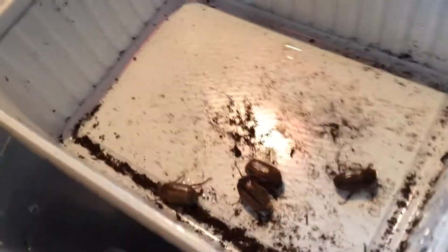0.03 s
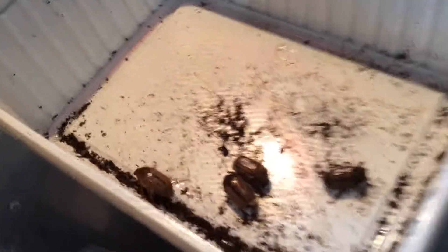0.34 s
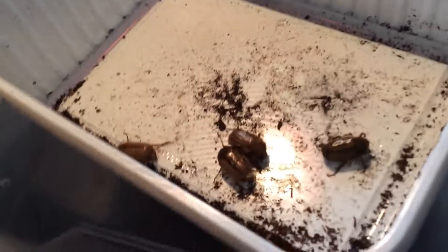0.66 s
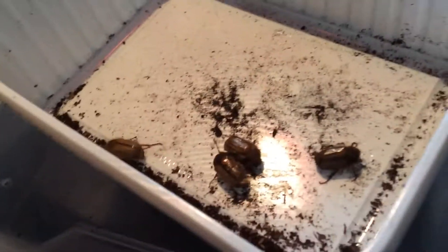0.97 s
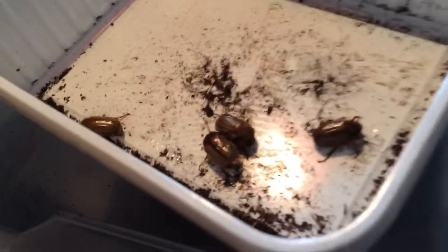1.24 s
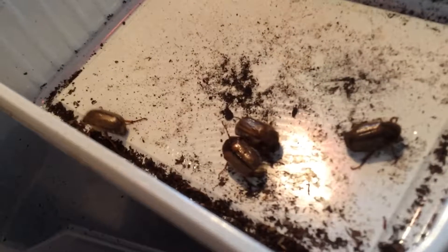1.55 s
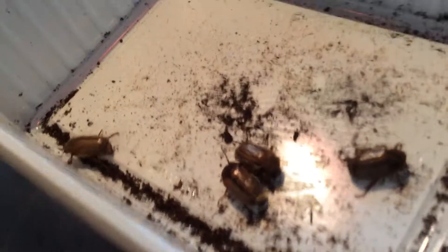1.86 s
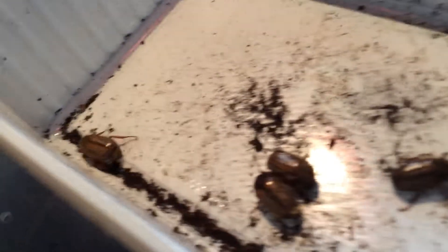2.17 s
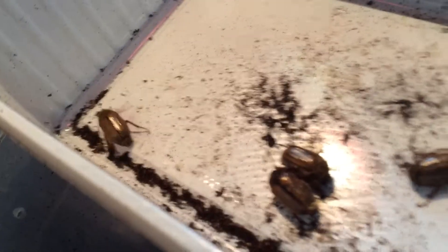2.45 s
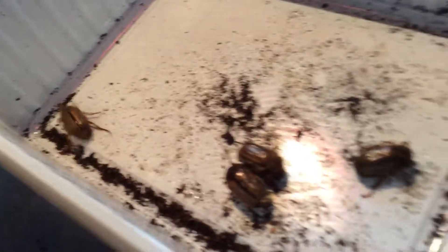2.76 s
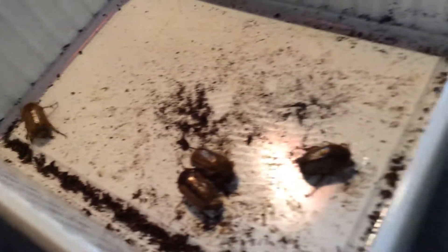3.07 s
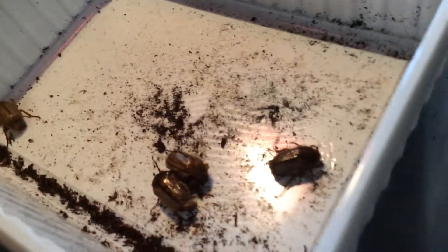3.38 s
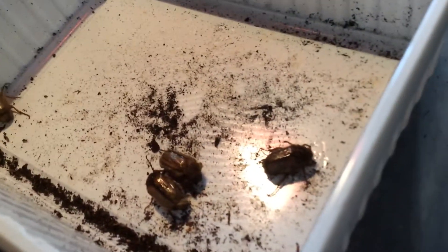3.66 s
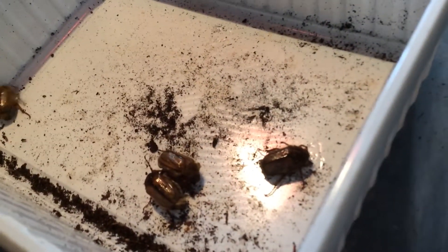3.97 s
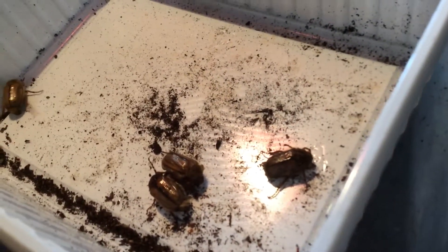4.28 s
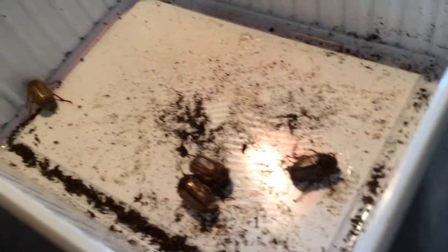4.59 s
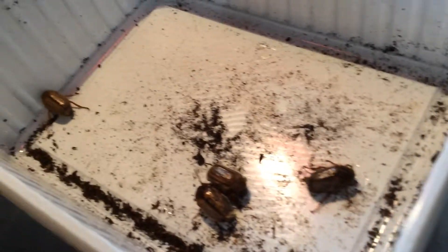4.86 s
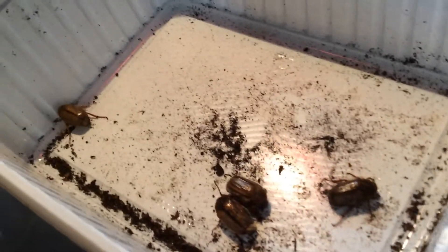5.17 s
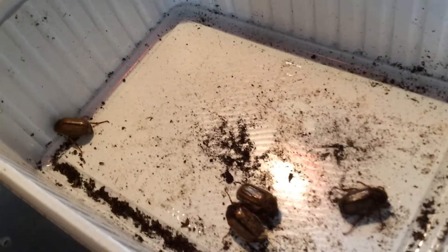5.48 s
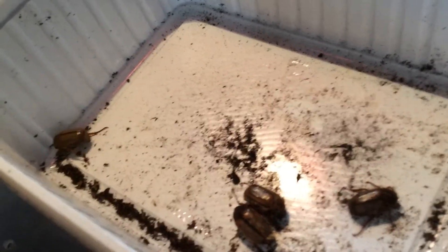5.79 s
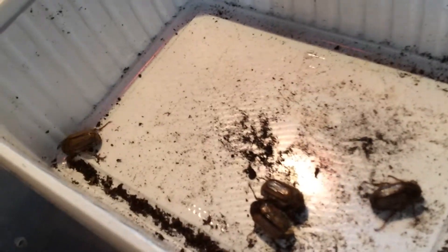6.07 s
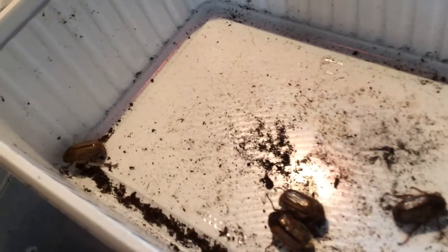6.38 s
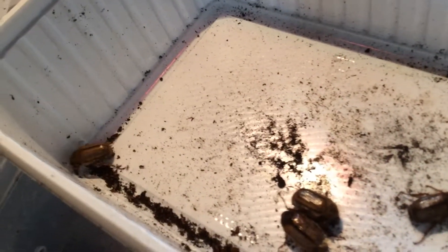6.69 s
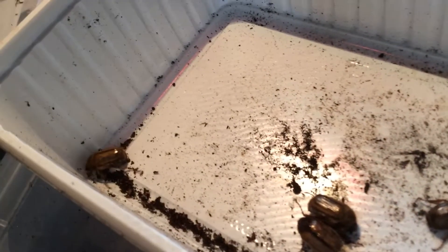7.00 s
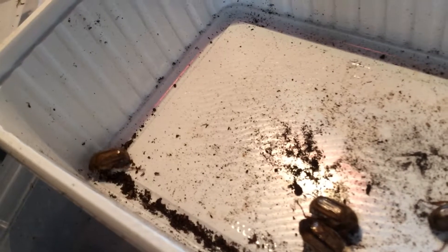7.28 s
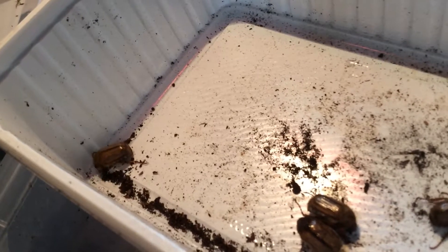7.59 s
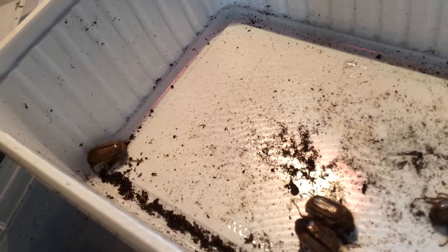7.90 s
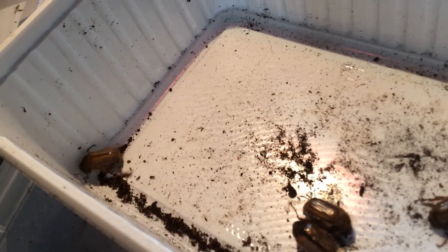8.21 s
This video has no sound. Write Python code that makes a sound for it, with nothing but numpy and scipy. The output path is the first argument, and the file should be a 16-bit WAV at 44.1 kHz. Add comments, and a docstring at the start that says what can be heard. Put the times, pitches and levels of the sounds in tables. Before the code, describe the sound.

A budgerigar chatters across a small room, its quick gliding notes, some pure and some husky, broken by short harsh squawks and a few sharp pips. The calls come irregularly throughout, with brief gaps. Close to the microphone, beetles scratch very faintly in a plastic tub, with small ticks and dry scuffs. The room adds a short reverberation over quiet hiss and low rumble.

```python
"""A budgerigar warbles in a small room: quick gliding notes, pure or husky, broken by harsh squawks
and a few sharp pips. A membrane in its syrinx vibrates in harmonic partials; unsteady vibration makes
a note husky, and chaotic vibration with turbulent air makes a squawk. Close by, beetles scratch
faintly in a plastic tub by stick-slip friction, among small ticks and dry scuffs.
The room reverberates, over quiet hiss, rumble and hum."""
import sys
import numpy as np
from scipy import signal
from scipy.fft import rfft, irfft, next_fast_len
from scipy.io import wavfile
from scipy.ndimage import map_coordinates

SR = 44100
rng = np.random.default_rng(int(sys.argv[2]) if len(sys.argv) > 2 else 0)


def unload_audio(sound):
    """Save the sound as a 16-bit wav file, at the path given as the first command line argument."""
    columns = np.transpose(np.atleast_2d(sound))
    # keep every value between -1 and 1, then stretch to whole-number steps
    steps = np.round(np.clip(columns, -1, 1) * 32767)
    wavfile.write(sys.argv[1], SR, steps.astype(np.int16))


N = 363384

# The notes of three syllables, timed in shares of the syllable's length:
# start_share, length_share, start_hz, end_hz, level_db, huskiness
CHATTER_NOTES = [(.03, .27, 2888, 2767, -5, 95), (.18, 0.256, 3445, 3166, -2, 170),
                 (.3, .36, 1930, 2448, -6, 133), (.53, .37, 3150, 2370, -0.5, 110),
                 (.82, .18, 2236, 1392, -8.5, 255)]  # an arch in two voices
CHUCKLE_NOTES = [(.01, 0.15, 2426, 2370, -3.5, 100), (.17, .21, 3518, 2884, -0.5, 150),
                 (.17, .38, 2650, 1777, -8.5, 171), (.47, .35, 2800, 2580, 0, 200),
                 (.77, .21, 2290, 1435, -6, 250)]  # both voices slide down
SQUEAL_NOTES = [(0, .45, 2980, 2750, -10, 260), (.18, .56, 3990, 3530, -13, 290),
                (.19, .5, 2280, 2100, -8.5, 200), (.57, .22, 2457, 2776, 0, 131),
                (.71, 0.26, 2937, 3800, -1, 270)]  # a husky start, pressed upward
# Each time the bird sings them:
# start_s, length_s, level_db, pitch_ratio, crescendo_db, accent_db, overtone_db
CHATTER_REPEATS = [(1.162, .15, -37, 0.97, -1.5, 6, -26), (3.23, .16, -45, 1.0, 0, -3.5, -32),
                   (3.449, .14, -35.5, 0.99, -12.5, 1.5, -26.5), (3.743, .14, -43.5, .98, 4, -12, -23),
                   (6.378, .15, -52.5, .98, 1, -3.5, -23), (6.913, 0.15, -43, 1.16, 4, 1, -24.5),
                   (7.216, .165, -32.5, 1.02, 1.5, 5, -18.5), (7.411, 0.16, -29.5, 1, -10.5, 1, -23),
                   (7.744, 0.16, -38, 1, -6.5, 3, -25.5)]
CHUCKLE_REPEATS = [(1.585, 0.15, -43, 1.003, 5, 1.5, -25), (1.803, 0.15, -38.5, 1.032, -4.5, 0.5, -30.5),
                   (2.019, .14, -49, .97, -11, 4.5, -22), (2.828, 0.19, -51, 0.84, 2, -1, -24),
                   (4.259, 0.19, -54.5, .91, 2.5, -0.5, -34), (4.525, .143, -46, 0.96, -2.5, 3, -30),
                   (5.818, 0.18, -51, .96, 3, 0.5, -14), (7.932, 0.12, -45, 1, 6, 0.5, -29.5)]
SQUEAL_REPEATS = [(.622, 0.13, -28, 1.03, -10, 5.5, -18), (0.849, 0.16, -25.5, 0.99, 10.5, -1.5, -13.5),
                  (5.307, .142, -32, .96, 5.5, 0.5, -18.5), (5.546, 0.19, -29.5, 1.006, 0, -4, -17.5)]


def warble():
    """Two-voiced song by superposition: overlapping glides form syllables, with whistles between."""
    return (syllables(CHATTER_NOTES, CHATTER_REPEATS) + syllables(CHUCKLE_NOTES, CHUCKLE_REPEATS)
            + syllables(SQUEAL_NOTES, SQUEAL_REPEATS) + whistles())


def syllables(notes, repeats):
    """Time scaling and transposition: one figure recurs, accented on its last note but one."""
    out = np.zeros(N)
    for start_s, length_s, level_db, pitch_ratio, crescendo_db, accent_db, overtone_db in repeats:
        for k, (start_share, length_share, start_hz, end_hz, note_db, huskiness) in enumerate(notes):
            from_middle = start_share + length_share / 2 - 0.5
            stress_db = crescendo_db * from_middle + accent_db * (k == len(notes) - 2)
            sound = note(length_share * length_s, pitch_ratio * start_hz, pitch_ratio * end_hz,
                         huskiness, overtone_db)
            add(out, start_s + start_share * length_s, amp(level_db + note_db + stress_db) * sound)
    return out


# Single notes between the syllables: start_s, length_s, start_hz, end_hz, level_db, huskiness
WHISTLES = [(.008, 0.013, 1596, 1604, -49.5, 44), (0.121, 0.034, 1990, 1700, -58.5, 149),
            (0.227, 0.091, 2250, 1620, -58, 160), (.515, 0.05, 3260, 3040, -36.5, 133),
            (0.54, 0.035, 3440, 4010, -35.5, 210), (0.559, 0.021, 2395, 803, -47.5, 252),
            (0.733, .02, 1920, 838, -50, 249), (1.042, 0.028, 1050, 980, -46, 80),
            (2.339, 0.12, 2320, 2380, -58, 470), (2.545, 0.077, 2440, 1630, -57, 300),
            (3.1, 0.0064, 3280, 3980, -45.5, 280), (3.877, 0.12, 1280, 1183, -58.5, 70),
            (4.091, 0.079, 954, 1354, -57, 22.8), (4.117, 0.033, 2217, 2406, -42, 119),
            (4.147, 0.057, 2570, 2795, -40, 90), (4.184, 0.033, 1877, 1335, -48, 201),
            (4.922, 0.027, 1540, 1690, -48, 80), (4.95, .038, 2790, 2890, -45, 236),
            (5.112, 0.021, 3355, 3240, -43.5, 200), (5.118, 0.053, 1868, 1180, -57.5, 185),
            (7.645, 0.033, 1640, 1617, -45, 46)]


def whistles():
    """Nonlinear brightening: the harder a lone note is driven, the larger its share of overtones."""
    out = np.zeros(N)
    for start_s, length_s, start_hz, end_hz, level_db, huskiness in WHISTLES:
        sound = note(length_s, start_hz, end_hz, huskiness, overtone_db=level_db + 22.5)
        add(out, start_s, amp(level_db) * sound)
    return out


# Spectrum of the air noise in a note: frequency_hz, gain_db
BREATH_SPECTRUM = [(700, -11), (1600, -0.5), (3000, -3.5), (6000, -1), (8500, -3.5), (10500, -20),
                   (15500, -46)]
BEAK_HZ, BEAK_HALF_WIDTH_HZ, BEAK_GAIN_DB = 8240, 510, 7


def note(length_s, start_hz, end_hz, huskiness, overtone_db):
    """Frequency modulation: an unsteady membrane makes a glide husky; beak resonance adds squeak."""
    t = np.arange(SR // 5) / SR
    progress = np.clip(t / length_s, 0, 1)
    glide_hz = start_hz + (end_hz - start_hz) * progress
    jitter_hz = 0.75 * huskiness * wobble(600, len(t))
    waver_hz = 70 * wobble(140.6, len(t))
    partials_db = [0, overtone_db, overtone_db - 11.5, overtone_db - 18.5]
    tone = syrinx(glide_hz + jitter_hz + waver_hz, partials_db)
    tone = coloured(tone, lambda hz: amp(BEAK_GAIN_DB / (1 + ((hz - BEAK_HZ) / BEAK_HALF_WIDTH_HZ) ** 2)))
    # a slower beat in the syrinx adds rough sidebands
    beat_hz = 620 + 130 * wobble(302.3, len(t))
    grit = 1 + 0.27 * np.sin(2 * np.pi * np.cumsum(beat_hz) / SR)
    breath = amp(overtone_db + 2) * noise(BREATH_SPECTRUM, len(t))
    cutoff_hz = 0.71 * min(start_hz, end_hz)  # nothing is radiated far below the note
    voice = coloured(grit * tone + breath, lambda hz: 1 / np.sqrt(1 + (cutoff_hz / (hz + 1)) ** 10))
    flutter = unit(amp(4 * wobble(130, len(t))))
    swell = np.abs(np.sin(np.pi * progress)) ** 0.29
    return in_room(swell * flutter * voice, wet=0.56)


def syrinx(pitch_hz, partials_db):
    """Harmonic series: a vibrating membrane sounds whole multiples of one pitch track."""
    phase = 2 * np.pi * np.cumsum(pitch_hz) / SR
    return unit(sum(amp(level_db) * np.sin(k * phase) * (k * pitch_hz < SR / 2)
                    for k, level_db in enumerate(partials_db, 1)))


# Harsh squawks: start_s, length_s, level_db, pitch_hz, scatter, tilt_db_per_octave
SQUAWKS = [(0.344, 0.048, -21, 2790, 0.1477, -3), (2.662, 0.042, -23, 2950, 0.143, -2),
           (3.582, 0.047, -22.5, 2880, 0.144, -1), (3.927, 0.056, -20.5, 2866, 0.076, 0.5),
           (4.722, 0.11, -22, 2843, 0.079, 0.5), (5.666, 0.04, -22.5, 2940, 0.133, -2.5),
           (7.119, 0.086, -22.5, 3078, 0.1521, 1.5), (8.129, 0.058, -20.5, 3018, 0.093, -0.5)]
# Frequency response of the throat: frequency_hz, gain_db
THROAT_RESPONSE = [(410, -51), (700, -46.5), (1270, -27.5), (1580, -21), (2160, -15), (2630, -9.5),
                   (2990, -8), (3320, -3.5), (4080, -7.5), (5940, 0.5), (7400, -8), (8760, -10),
                   (12600, -12.5), (14500, -25), (15500, -29)]


def squawks():
    """Source and filter: a membrane driven into chaos and turbulent air sound through the throat."""
    out, t = np.zeros(N), np.arange(SR // 5) / SR
    for start_s, length_s, level_db, pitch_hz, scatter, tilt_db_per_octave in SQUAWKS:
        jitter = 0.729 * scatter * wobble(1800, len(t))
        voice = syrinx(pitch_hz * (1 + jitter), partials_db=[-1.5, 4, 12, -2.5, 10.5])
        turbulence = amp(2.5) * rng.standard_normal(len(t))
        rasp = (voice + turbulence) * amp(4 * wobble(450, len(t)))
        cry = coloured(rasp, lambda hz: amp(along(THROAT_RESPONSE, hz)
                                            + tilt_db_per_octave * np.log2((hz + 1) / 6000)))
        attack = np.clip(t / 0.016, 0, 1)
        release = np.clip((length_s - t) / 0.011 + 0.5, 0, 1)
        add(out, start_s, in_room(amp(level_db) * attack * release * unit(cry), wet=0.89))
    return out


# Very short contact calls: start_s, level_db, pitch_hz
PIPS = [(1.41, -38.5, 2573), (3.263, -48.5, 2300), (6.086, -39, 2653), (6.682, -40.5, 2402)]


def pips():
    """Harmonic tone bursts: the pitch sags slightly and the second partial is strongest."""
    out, t = np.zeros(N), np.arange(SR // 20) / SR
    for start_s, level_db, pitch_hz in PIPS:
        jitter = 0.04 * wobble(999, len(t))
        tone = syrinx(pitch_hz * (1 - 1.5 * t + jitter), partials_db=[-7, 1, -9.5, -10.5, -14])
        add(out, start_s, in_room(amp(level_db) * pulse(t, rise_s=0.0058) * tone, wet=0.51))
    return out


# Scratching activity of the beetles: time_s, level_db
CLAW_ACTIVITY = [(0, -64.5), (1.5, -68.5), (2.3, -57), (2.6, -71), (3.4, -69), (4.5, -74), (5.3, -59),
                 (6.2, -74.5), (6.5, -62), (6.7, -65.5), (6.95, -62.5), (7.2, -59), (8.24, -68)]
# Spectrum of a contact on the plastic: frequency_hz, gain_db
SCRATCH_SPECTRUM = [(600, -14), (1500, 7), (2500, 5.5), (5000, 1.5), (9000, 2), (13000, 2.5), (15500, -48)]
SLIPS_PER_S, SLIP_DECAY_S = 130, 0.0049


def beetles():
    """Stick-slip friction: claws catch and slip on plastic in tiny random clicks, bunched into steps."""
    sizes = amp(2.7 * np.clip(rng.standard_normal(N), -2, 2))
    slips = (rng.random(N) < SLIPS_PER_S / SR) * sizes
    steps = amp(3.5 * wobble(22, N))
    t = np.arange(SR // 50) / SR
    envelope = signal.fftconvolve(slips * steps, np.exp(-t / SLIP_DECAY_S))[:N]
    scratching = in_room(envelope * noise(SCRATCH_SPECTRUM, N), wet=0.23)[:N]
    return amp(curve(CLAW_ACTIVITY)) * unit(scratching)


# Small hard contacts on the plastic: start_s, level_db, ring_db
TICKS = [(0.7878, -48, -3), (1.1175, -43.5, -17), (2.266, -47, -20), (2.34, -46.5, -4), (2.4992, -41, -40),
         (2.517, -47.5, -0.5), (3.2824, -54, 0), (5.1966, -44.5, -23), (6.2287, -63, -27),
         (6.4173, -55, -28)]
# Vibration modes of the tub: frequency_hz, level_db, t60_s
TUB_MODES = [(817, -3.5, 0.068), (1100, -9, 0.01845), (1304, -6, 0.023), (2150, -19, 0.014),
             (3520, -12, 0.02)]


def ticks():
    """Impact excitation: each contact cracks and briefly rings the damped modes of the tub."""
    out, t = np.zeros(N), np.arange(SR // 8) / SR
    for start_s, level_db, ring_db in TICKS:
        crack = noise(SCRATCH_SPECTRUM, len(t)) * np.exp(-t / 0.0027)
        ring = sum(amp(mode_db + 2 * rng.normal() - 60 * t / t60_s) * np.sin(2 * np.pi * hz * t)
                   for hz, mode_db, t60_s in TUB_MODES)
        add(out, start_s, in_room(amp(level_db) * (crack + amp(ring_db) * ring), wet=0.55))
    return out


# Short dry rubs: start_s, rise_s, level_db
SCUFFS = [(1.5, 0.012, -54), (3.266, 0.0053, -54), (6.77, 0.013, -45.5), (6.844, 0.0084, -55)]


def scuffs():
    """Friction noise: brief grainy rubs swell and die away."""
    out, t = np.zeros(N), np.arange(SR // 8) / SR
    spectrum = [(250, -47), (700, -5.5), (1500, -2), (3000, 2.5), (5000, -5.5), (7000, -10.5),
                (15500, -18)]
    for start_s, rise_s, level_db in SCUFFS:
        grains = unit(amp(1.44 * wobble(540, len(t))))
        rub = grains * noise(spectrum, len(t))
        add(out, start_s, in_room(amp(level_db) * pulse(t, rise_s) * rub, wet=0.27))
    return out


# Reverberation time of the room: frequency_hz, t60_s
ROOM_DECAY = [(500, .32), (2500, .31), (6000, .3), (10000, .28), (15000, .24)]


def in_room(x, wet):
    """Reverberation: direct sound plus a diffuse tail, new each time because the source moves."""
    hz, t, spectra = signal.stft(rng.standard_normal(SR // 2), SR, nperseg=256)
    decay = amp(-60 * t / along(ROOM_DECAY, hz)[:, None])
    tail = signal.istft(spectra * decay, SR, nperseg=256)[1]
    tail *= 1 - np.exp(-np.arange(len(tail)) / SR / 0.0024)  # reflections build up
    response = np.sqrt(wet) * tail / np.linalg.norm(tail)  # wet is the tail's share of the energy
    response[0] += np.sqrt(1 - wet)
    heard = signal.fftconvolve(x, response)
    return heard * np.linalg.norm(x) / (np.linalg.norm(heard) + 1e-20)


# Spectrum of the steady room noise: frequency_hz, gain_db
HISS_SPECTRUM = [(15, -29), (25, -4), (86, 0.5), (331, -5), (567, -13), (804, -7), (1080, -12), (1800, -27),
                 (1950, -4.5), (3720, -13.5), (5010, -8), (6550, -29), (8350, -10.5), (12800, -17.5),
                 (15500, -15)]
# Course of the low room noise, peaks of its soft bumps, and swell of the hum: time_s, level_db
RUMBLE_LEVEL = [(0, -70.5), (.8, -71.5), (1.2, -73), (2.8, -74), (4.5, -76), (6.5, -80), (7.2, -71.5),
                (8.24, -79)]
BUMPS = [(0.251, -64), (0.589, -61), (0.789, -59), (1.441, -62), (1.892, -64), (2.84, -60.5), (3.3, -67),
         (5.671, -64.5)]
HUM_LEVEL = [(0, -97), (7.1, -83), (7.7, -73.5), (8.24, -73)]
HISS_DB, HUM_HZ = -67, 75.4


def background():
    """Ambient noise floor: even hiss, a low rumble with soft bumps, and a faint hum that swells late."""
    t = np.arange(N) / SR
    bumps = sum(amp(level_db) * np.exp(-((t - time_s) / 0.012) ** 2) for time_s, level_db in BUMPS)
    rumble_spectrum = [(20, -62), (55, -17), (130, 0), (300, -9.5), (700, -14), (2000, -65)]
    rumble = (amp(curve(RUMBLE_LEVEL)) + bumps) * noise(rumble_spectrum, N)
    hum_phase = 2 * np.pi * HUM_HZ * t + 0.53 * wobble(4.8, N)
    hum = amp(curve(HUM_LEVEL)) * np.sqrt(2) * np.sin(hum_phase)
    return amp(HISS_DB) * noise(HISS_SPECTRUM, N) + rumble + hum


def amp(db):
    """Decibels to gain."""
    return 10 ** (np.asarray(db) / 20)


def unit(x):
    """Normalisation to rms 1."""
    return x / np.sqrt(np.mean(x ** 2) + 1e-20)


def along(points, hz):
    """Interpolation of (frequency_hz, value) points on a log frequency axis."""
    knots_hz, values = np.transpose(points)
    return np.interp(np.log(hz + 1), np.log(knots_hz + 1), values)


def curve(rows):
    """Linear interpolation of (time_s, value) rows at every sample."""
    return np.interp(np.arange(N) / SR, *np.transpose(rows))


def pulse(t, rise_s):
    """Critically damped envelope: it peaks at 1 after rise_s, then dies away."""
    return t / rise_s * np.exp(1 - t / rise_s)


def wobble(knots_per_s, size):
    """Random modulation: a smooth curve through Gaussian knots."""
    return map_coordinates(rng.standard_normal(size), [np.arange(size) * knots_per_s / SR], mode="wrap")


def coloured(x, gain):
    """Zero-phase filtering by a gain that is a function of frequency."""
    size = next_fast_len(len(x) + 4096)
    return irfft(rfft(x, size) * gain(np.fft.rfftfreq(size, 1 / SR)), size)[:len(x)]


def noise(spectrum, size):
    """White noise shaped by (frequency_hz, gain_db) points, at rms 1."""
    return unit(coloured(rng.standard_normal(size), lambda hz: amp(along(spectrum, hz))))


def add(track, start_s, x):
    """Superposition of x on the track from start_s."""
    start = int(np.clip(start_s * SR, 0, N - 1))
    track[start:start + len(x)] += x[:N - start]


def scene():
    """Superposition in one channel: the bird across the room, the tub close by, the noise floor."""
    return (warble() + squawks() + pips() + ticks() + scuffs() + beetles() + background())[None]


def record(dry):
    """Band limiting: the microphone keeps nothing above 15500 Hz."""
    return np.array([coloured(channel, lambda hz: hz < 15500) for channel in dry])


dry = scene()
out = record(dry)
unload_audio(out)
```